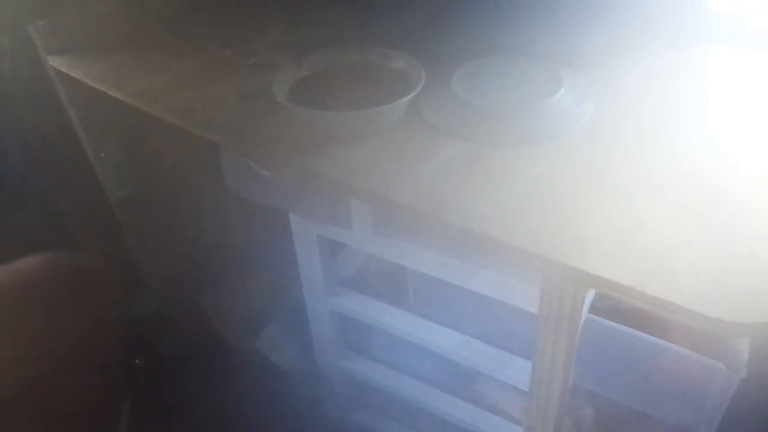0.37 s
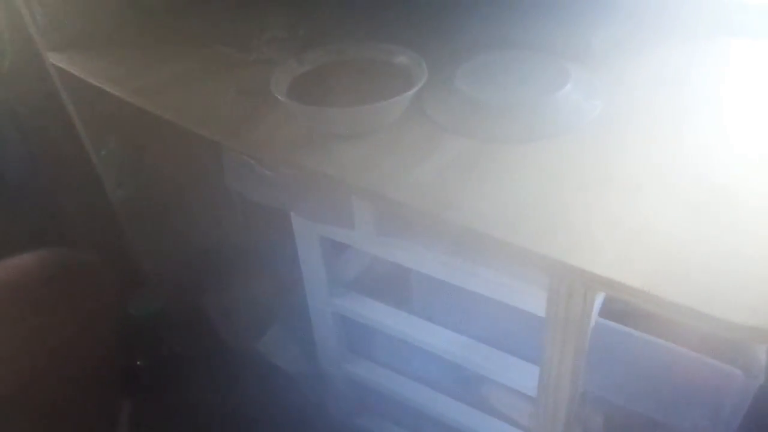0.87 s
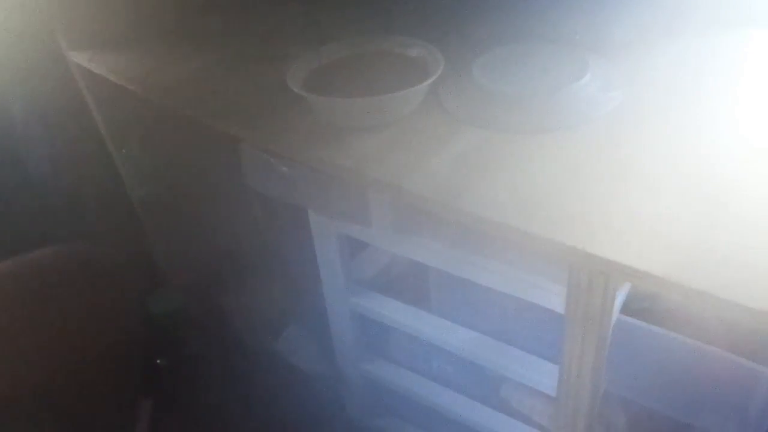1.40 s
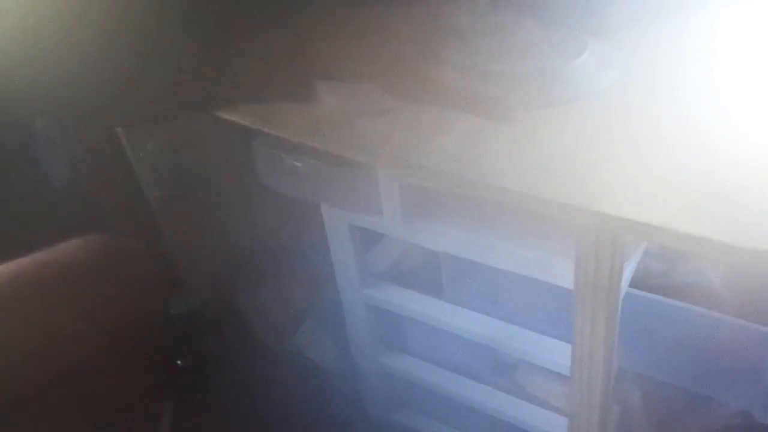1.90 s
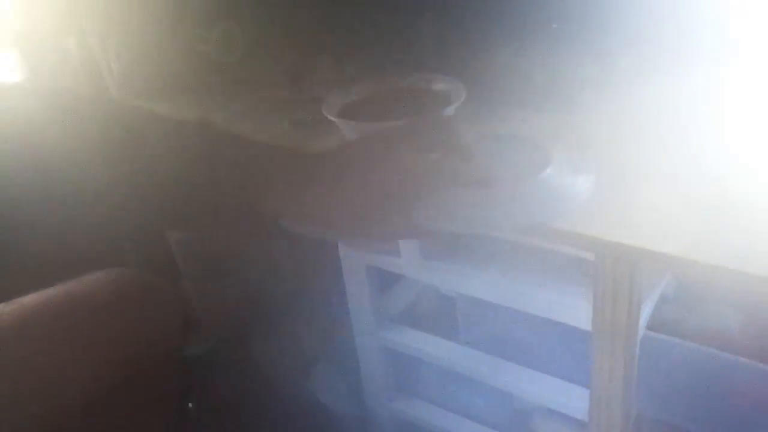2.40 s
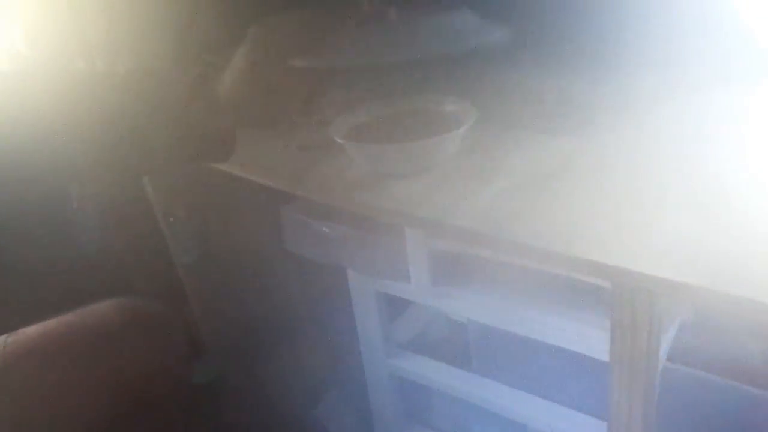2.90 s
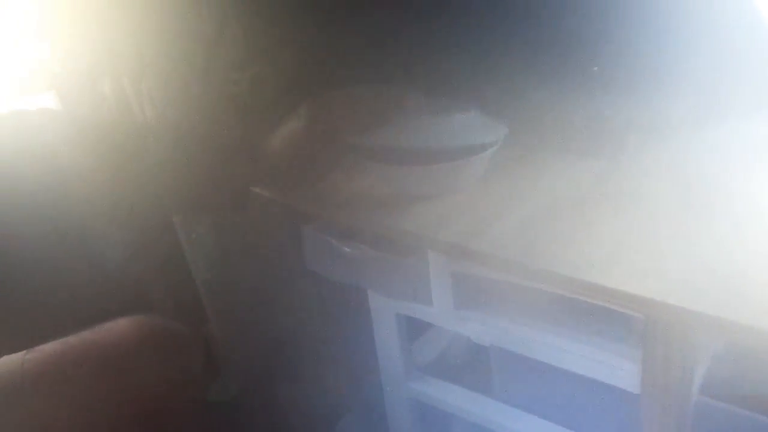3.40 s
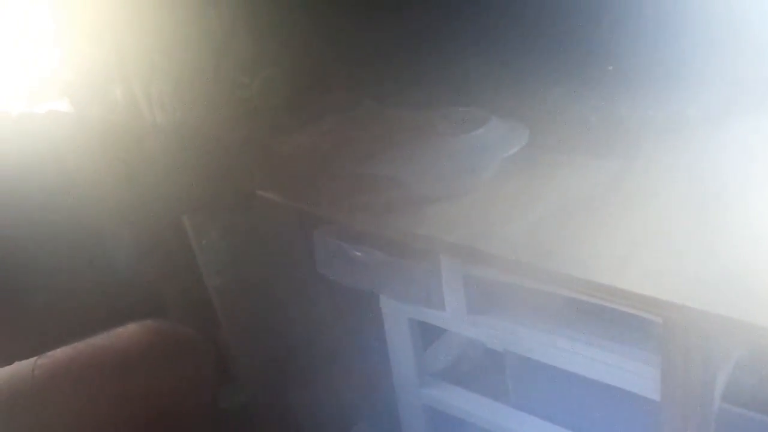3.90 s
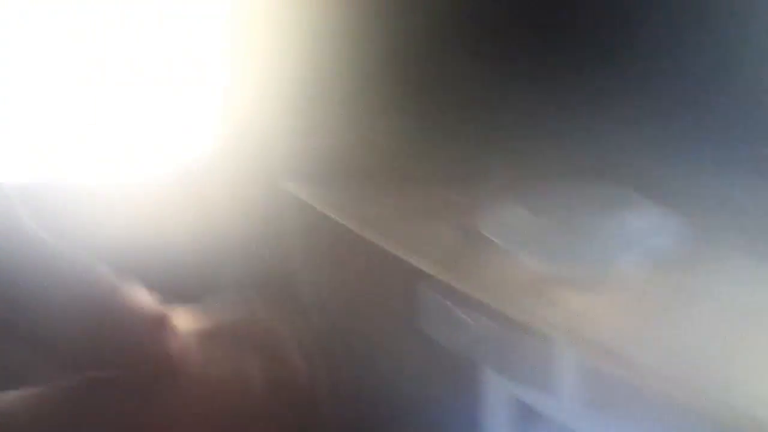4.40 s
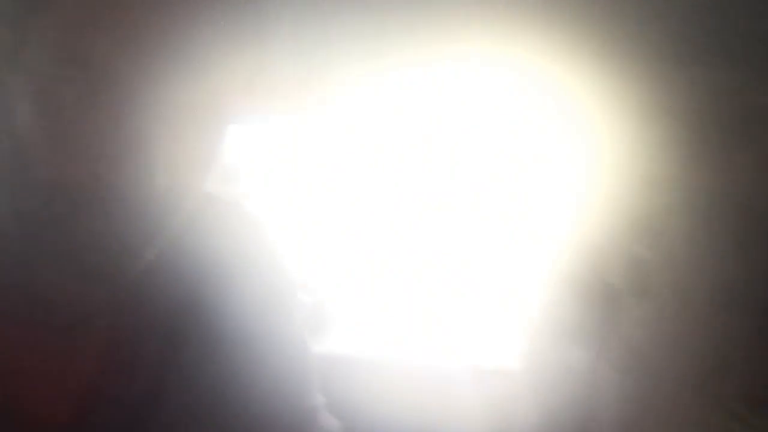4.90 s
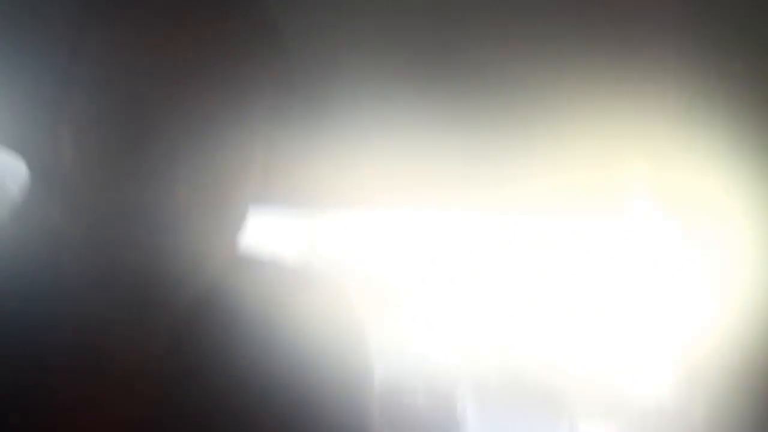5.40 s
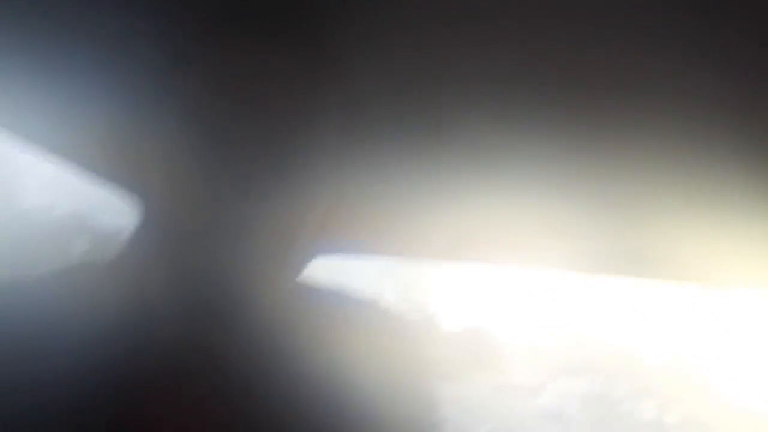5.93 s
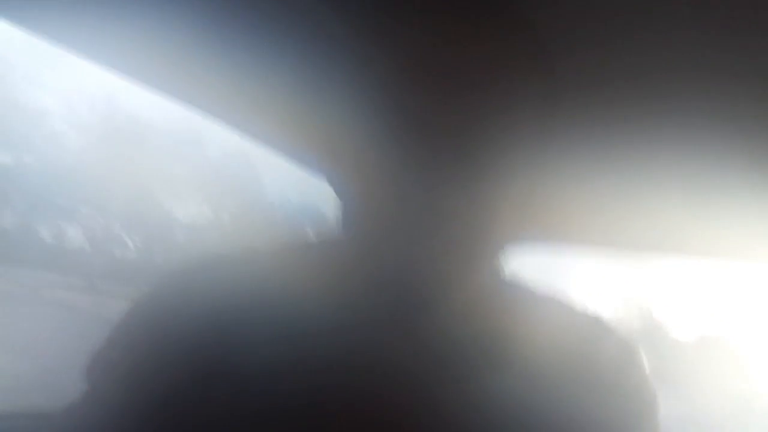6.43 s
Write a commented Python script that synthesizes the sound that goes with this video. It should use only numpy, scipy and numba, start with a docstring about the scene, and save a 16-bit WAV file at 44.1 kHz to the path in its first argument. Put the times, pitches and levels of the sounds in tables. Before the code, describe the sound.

Close clattering of spoon and crockery on a wooden counter, a gritty plate scrape, a hard set-down, then small sharp taps and faint rustles.

```python
"""A spoon drops and rattles in a dish on a wooden counter, close to the microphone in a small quiet cabin;
a plate is dragged off, knocks its rim and is set down on a bowl. Light taps and rustles are heard too.
Each blow rings the object's modes and a dense short clatter; rubbing is rough noise, partly through modes.
A short room tail, a low thud and a soft murmur lie underneath; the loudest blows clip."""
import sys
import numpy as np
from scipy import signal
from scipy.fft import rfft, irfft
from scipy.io import wavfile
from scipy.ndimage import uniform_filter1d
from numba import njit

SR = 44100
rng = np.random.default_rng(int(sys.argv[2]) if len(sys.argv) > 2 else 0)


def dump(signal):
    """Clip the signal to [-1, 1] and save it as 16-bit WAV at the path in sys.argv[1]."""
    limited = np.clip(np.atleast_2d(signal).T, -1, 1)
    pcm = np.round(limited * 32767).astype(np.int16)
    wavfile.write(sys.argv[1], SR, pcm)


def convert_level_to_amplitude(level_db):
    """Map a level in decibels to its linear amplitude factor."""
    exponent = np.asarray(level_db, float) / 20
    return 10 ** exponent


N = 288766
TIME = np.arange(N) / SR

# ringing modes of the spoon, the first a low thump of the counter beneath it: pitch_hz, level_db, t60_s
SPOON_MODES = [(50, -12.5, .06), (1124, 4.5, 0.13), (1256.4, -4.5, .06), (1900, -9.5, 0.083),
               (2160, -15, 0.041), (2359, -7, 0.13), (2705, -12.5, .05), (3517, -8.5, .2), (3505, -8, 0.26),
               (4560, -7.5, 0.17), (6673, -19.5, 0.15), (7500, -20.5, .15), (8100, -22, .1),
               (10900, -25.5, .04)]
# ringing modes of the plate: pitch_hz, level_db, t60_s
PLATE_MODES = [(90, -19.5, 0.072), (534, -2.5, 0.07), (826, 5.5, 0.04), (1130, -4, 0.21),
               (1276, -3.5, 0.034), (1841, -20.5, 0.021), (2364, -7, 0.22), (2886, 6, 0.048),
               (3730, 1, 0.031), (4490, 1, 0.052), (5105, -1.5, 0.075), (6400, -11, 0.097),
               (6830, -2.5, 0.048), (6720, -16.5, 0.2), (7600, -27, .06), (8530, -6, 0.07),
               (10400, -24, .06), (10800, -21.5, 0.16), (11300, -22, 0.05), (12420, -19.5, .08)]


def level(x, db):
    """Scale to an rms level in dB."""
    return x * convert_level_to_amplitude(db) / np.sqrt(np.mean(x ** 2))


def colour(x, points):
    """Filter by (Hz, dB) points joined on a log-frequency axis."""
    hz, db = np.transpose(points)
    bins_hz = np.fft.rfftfreq(len(x), 1 / SR)
    gain_db = np.interp(np.log(bins_hz + 1), np.log(hz), db)
    return irfft(rfft(x) * convert_level_to_amplitude(gain_db), len(x))


def treble(x, hz):
    """The part above hz, without phase shift."""
    return signal.sosfiltfilt(signal.butter(3, hz, "high", fs=SR, output="sos"), x)


def curve(table, column=1):
    """A dB column over time; -120 dB outside the table."""
    table = np.array(table)
    return np.interp(TIME, table[:, 0], table[:, column], left=-120, right=-120)


def walk(rate_hz, size=N):
    """Random levels held 1 / rate_hz s and slewed twice; spread near 1."""
    hold = int(SR / rate_hz)
    steps = np.repeat(rng.standard_normal(size // hold + 1), hold)
    return 1.3 * uniform_filter1d(uniform_filter1d(steps, hold), hold)[:size]


@njit
def add(out, start, hz, gain, rate, phase, grip, rise):
    """Add modes from one blow: each swells over the contact time, then decays as fast as the grip makes it."""
    for m in range(len(hz)):
        z = gain[m] * np.exp(1j * phase[m])
        turn = np.exp(2j * np.pi * hz[m] / SR)
        lack = 1.
        for i in range(start[m], len(out)):
            out[i] += z.imag * (1 - lack)
            z *= turn * (1 - rate[m] * grip[i])
            lack *= rise
            if abs(z.real) + abs(z.imag) < 3e-5:
                break


def strike(blows, modes, bands_db, grip, clatter_db, clatter_t60_s, shorten, tilt_db, scatter_db,
           contact_s, smear_s, scramble=1, count=120):
    """Every blow rings the object's modes plus many short unnamed ones; hardness and focus lean its balance."""
    # borders of the five bands: edge_hz
    band_edges_hz = [900, 1600, 3100, 4200]
    # where the blows land favours one region of the ring: from_s, favoured_hz
    spot = [(0, 1150), (1.0, 2400), (1.5, 1188), (1.655, 1900), (1.695, 2950), (1.72, 1455), (1.8, 1300),
            (2.1, 4970), (2.29, 560), (2.35, 1130), (2.59, 1180), (2.598, 4880), (2.66, 3660), (3.0, 1250),
            (3.49, 2800), (3.6, 804), (3.8, 522), (3.81, 3644), (3.815, 520), (3.87, 3720), (4.0, 1420),
            (5.0, 450)]
    spot_db, spot_octaves = 9, 0.26
    out = np.zeros(N)
    hz, db, t60_s = np.transpose(modes)
    step = np.arange(-2, 3)  # bands away from the middle one
    chances = rng.random((len(blows), 5, len(hz) + count))
    for (s, level_db, hard_db, focus_db), chance in zip(blows, chances):
        place = (np.arange(count) + chance[0, :count]) / count
        clatter_hz = 120 * (14000 / 120) ** place ** .75
        # each contact detunes the ring a little
        all_hz = np.r_[hz, clatter_hz] * (1 + .007 * (chance[4] - .5))
        all_db = np.r_[db, clatter_db + tilt_db * np.abs(np.log2(clatter_hz / 1500))]
        gain = convert_level_to_amplitude(all_db + scatter_db * (2 * chance[1] - 1))
        # share the blow's power among the bands
        band = np.digitize(all_hz, band_edges_hz)
        share = convert_level_to_amplitude(np.array(bands_db) + hard_db * step - focus_db * step ** 2)
        power = np.bincount(band, gain ** 2)
        gain = gain * (convert_level_to_amplitude(level_db) * share / np.sqrt(np.sum(share ** 2) * power))[band]
        # lean towards the favoured region at equal power
        spot_hz = [favoured_hz for since_s, favoured_hz in spot if since_s <= s][-1]
        lean = convert_level_to_amplitude(spot_db * np.exp(-(np.log2(all_hz / spot_hz) / spot_octaves) ** 2))
        gain = gain * lean * np.sqrt(np.sum(gain ** 2) / np.sum((gain * lean) ** 2))
        # the clatter dies faster towards the treble
        all_t60_s = np.r_[t60_s, clatter_t60_s * (clatter_hz / 1000) ** -shorten]
        rate = np.log(1000) / SR / all_t60_s
        # a rim lands point after point, so the modes do not all start together
        start = ((s + smear_s * chance[3] ** 3) * SR).astype(int)
        phase = 2 * np.pi * scramble * (chance[2] - .5)
        add(out, start, all_hz, gain, rate, phase, grip, np.exp(-1 / (contact_s * SR)))
    return out


def hand_grip():
    """How hard hand and contact damp spoon and plate, over time."""
    # damping: time_s, decay rate as a multiple of the free ring
    grip_points = [(1.54, 1.5), (1.75, 1.3), (2.1, 1.3), (2.59, 1.0), (2.675, 1.7), (2.73, 1.1), (3.5, 1.7),
                   (3.55, 1.2), (3.85, 1.7)]
    return np.clip(np.interp(TIME, *np.transpose(grip_points)), .3, 8)


def spoon_drop(grip):
    """The spoon bounces in the dish, each blow ringing its modes under a bright clatter."""
    # blows: start_s, level_db, hard_db gained per band upwards, focus_db lost per squared band from the middle
    blows = [(1.5404, 12.5, 0.5, 0), (1.5524, -8, -5, -6.5), (1.5874, 2, -1, 1.2), (1.5948, 1.5, 0.3, -1),
             (1.6334, -11.5, -1.4, -1.2), (1.6504, -10, -0.9, 0.3), (1.6594, -8.5, 0.5, 0.5),
             (1.6814, -9, 5, 1), (1.6964, -4, 1, 0), (1.7, 0, -1.44, -1.5), (1.7064, -10, 10, 3.5),
             (1.7344, 0, 2.9, 2), (1.7524, -9, 5, 1), (1.7674, -3.5, -1.5, 3.5),
             (1.7924, -16.5, -1.05, 1.3), (1.8114, -10.5, -6.5, 6), (1.8324, -10.5, -24.5, 5),
             (1.8474, -28, -25, -2), (1.8694, -28, -8, 4)]
    # balance of an average blow, five bands low to high: level_db
    bands_db = [-4, 7.5, 10.5, 2, -5.5]
    return strike(blows, SPOON_MODES, bands_db, grip, clatter_db=2.0, clatter_t60_s=0.035, shorten=.1,
                  tilt_db=-4.5, scatter_db=6.0, contact_s=0.00041, smear_s=0.0024)


def plate_knocks(grip):
    """The plate knocks its rim: longer contacts ring its modes, with little clatter."""
    # blows: start_s, level_db, hard_db gained per band upwards, focus_db lost per squared band from the middle
    blows = [(2.1662, -14.5, 1, 1.8), (2.1856, -17, -0.1, 1.9), (2.2245, -20, -1, 3), (2.2541, -20, 2, 2),
             (2.2992, -5.5, -9, 0.85), (2.3124, -8, -6, 2), (2.3264, -12.5, -13, -17.5),
             (2.372, -33.5, -6, -1), (2.4236, -27, -13, -2.9), (2.4382, -25, -4.5, -0.5),
             (2.594, 0.5, 1, 0.96), (2.5997, -8, 2.5, -2.26), (2.6184, -6, -2, -1.1),
             (2.6374, -12, -1.5, 1), (2.6439, -5.5, -1.5, 0.4), (2.6808, -5, -1.2, -0.7),
             (2.6865, -9.5, -1.35, -0.1), (2.6928, -2.5, -0.8, 1.5), (2.7034, -15, 0, -1.3)]
    # balance of an average blow, five bands low to high: level_db
    bands_db = [-5.5, -3, 0, -0.5, 0.5]
    return strike(blows, PLATE_MODES, bands_db, grip, clatter_db=-8.5, clatter_t60_s=.065, shorten=.1,
                  tilt_db=-4.5, scatter_db=7.5, contact_s=0.001, smear_s=0.0018)


def rocking(count=5):
    """Touches of the settling plate: ever slower, weaker and softer."""
    start_s, gap_s, growth = 3.8352, .011, 1.15
    k = np.arange(count)
    s = start_s + gap_s * (growth ** k - 1) / (growth - 1)
    level_db, hard_db = -10.5 - 3.5 * k, -0.4 - 1 * k
    return list(zip(s, level_db, hard_db, 0 * k - 1))


def plate_on_bowl(grip):
    """The plate is set down on the bowl and rocks to rest; the pair rings in modes of its own."""
    # blows: start_s, level_db, hard_db gained per band upwards, focus_db lost per squared band from the middle
    blows = [(3.485, 3.5, -0.5, 0.3), (3.4914, -6.5, 1.6, -3.04), (3.4989, -10.5, 1, 2),
             (3.5149, -23, 4.8, 1.5), (3.63, -42, -3, -1.2), (3.787, -24, -3.5, -0.05),
             (3.794, -33, 0.4, 1.3), (3.8052, 3, 0.05, -0.97), (3.8116, 1, 3.5, 1.7),
             (3.8202, -15, 1.5, -6.5)]
    # modes of the plate resting on the bowl: pitch_hz, level_db, t60_s
    modes = [(80.4, -20.5, .1), (245, -8, 0.25), (537.8, -2, 0.078), (820, 4.5, 0.12), (1276, -4, 0.077),
             (1750, -7.5, 0.012), (2340, -3, 0.069), (2810, 7, 0.085), (3628, -2.5, 0.051),
             (4390, 0.5, 0.05), (5120, 0, 0.043), (6710, -8, 0.097), (7092, -10.5, .045),
             (7430, -17.5, 0.028), (8700, -13, 0.095), (10070, -18.5, 0.046), (10630, -15.5, .04),
             (12200, -19.5, 0.05)]
    # balance of an average blow, five bands low to high: level_db
    bands_db = [-6.5, -1.5, 4, 1, 1]
    return strike([*blows, *rocking()], modes, bands_db, grip, clatter_db=-6, clatter_t60_s=0.043,
                  shorten=0.037, tilt_db=-5.0, scatter_db=3.5, contact_s=0.00061, smear_s=0.0024)


def thud():
    """One low damped swing under the first drop."""
    start_s, level_db, pitch_hz, t60_s = 1.5404, -22, 33, 0.086
    t = np.clip(TIME - start_s, 0, None)
    return convert_level_to_amplitude(level_db) * np.sin(2 * np.pi * pitch_hz * t) * np.exp(-np.log(1000) * t / t60_s)


def grit(per_s, size_db, catch_s, smooth):
    """Short catches of unequal size roughen smooth rubbing."""
    catches = (rng.random(N) < per_s / SR) * convert_level_to_amplitude(size_db * rng.exponential(size=N))
    catches = signal.lfilter([1], [1, -np.exp(-1 / (catch_s * SR))], catches)
    return (level(catches, 0) + smooth) * rng.standard_normal(N)


def ring(x, modes, damping, shift_db, span):
    """Rubbing through the modes of an object; the moving contact favours now one mode, now another."""
    out = np.zeros(N)
    part = slice(int(span[0][0] * SR), int(span[-1][0] * SR))
    for hz, db, t60_s in modes:
        pole = np.exp(2j * np.pi * hz / SR - damping * np.log(1000) / (t60_s * SR))
        push = x[part] * convert_level_to_amplitude(db + shift_db * walk(39, size=len(x[part])))
        out[part] += np.sqrt(damping / t60_s) * signal.lfilter([1], [1, -pole], push).imag
    return out / np.std(out[part])


def drag():
    """The plate's foot grinds over wood: grit hisses and shakes the plate's modes."""
    # sliding contact: time_s, level_db, treble_db against it
    slide = [(2.04, -73, -0.5), (2.078, -46.5, -4), (2.114, -47.5, -8.5), (2.162, -35, 10),
             (2.294, -29.5, 3.5), (2.32, -27.5, -1), (2.356, -38, -4), (2.448, -40, -7.5), (2.52, -64.5, 1)]
    # spectrum of the hiss: freq_hz, level_db (per Hz)
    hiss_points = [(59, -50), (100, -14.5), (400, -3), (993, -11.5), (1220, 1), (1810, -15), (2850, -9),
                   (6000, -20.5), (12400, -21.5), (14000, -27.5)]
    rub = grit(per_s=260, size_db=2.3, catch_s=0.00099, smooth=1.0)
    hiss = level(colour(rub, hiss_points), 0)
    both = hiss + convert_level_to_amplitude(-7.0) * ring(level(rub, 0), PLATE_MODES, damping=1.3, shift_db=3.1, span=slide)
    bright = treble(both, 4000)
    return convert_level_to_amplitude(curve(slide)) * (both - bright + convert_level_to_amplitude(curve(slide, column=2)) * bright)


def rattle():
    """The spoon chatters on between its clear bounces: gritty rubbing, plain and through its modes."""
    # chatter: time_s, level_db
    chatter = [(1.545, -39.5), (1.6, -34.5), (1.676, -29), (1.706, -27.5), (1.748, -22.5), (1.85, -29),
               (1.886, -34), (1.96, -67.5)]
    # spectrum of the plain rubbing: freq_hz, level_db (per Hz)
    rub_points = [(100, -24.5), (400, -9), (800, 2.5), (1300, -6.5), (2500, -3), (3600, -15.5),
                  (5000, -22.5), (9000, -32), (14000, -34)]
    rub = grit(per_s=360, size_db=2.5, catch_s=.0025, smooth=.6)
    plain = level(colour(rub, rub_points), 0.089)
    ringing = convert_level_to_amplitude(-9.5) * ring(rub, SPOON_MODES, damping=1.3, shift_db=5.5, span=chatter)
    return convert_level_to_amplitude(curve(chatter)) * (plain + ringing)


def taps():
    """Light taps ring the counter's modes in short sharp contacts."""
    # blows: start_s, level_db, hard_db gained per band upwards, focus_db lost per squared band from the middle
    blows = [(0.5644, -37, 3.5, -1.3), (0.7861, -23, 2.3, 2.5), (0.8, -32, 4, -2), (0.9744, -41, -4, 5),
             (1.4222, -40, 6, -1.5), (3.053, -38.5, 7, -4.5), (4.2714, -24, 5, 2),
             (4.5587, -30.5, 1.2, 1.1), (4.6964, -41, 0.1, 9), (4.7275, -36.5, -6.5, 2.3),
             (5.2434, -40, -1.5, 8), (5.3124, -37.5, -4, 3), (5.3217, -29.5, -2, 4),
             (5.3374, -32.5, -1.5, 4), (5.3508, -17.5, 0.76, 1), (5.4655, -29.5, -1, 3.5),
             (5.4824, -43.5, 10, -4), (5.4934, -25.5, -8.5, 5.5), (5.5119, -35, 3, -1.1),
             (5.6433, -38.5, -9, 4.5), (5.6512, -15.5, 2, 1.7), (5.7774, -36, -12, 0.1),
             (5.7838, -23, 1.1, 2.2), (5.7926, -14, 7.5, 0.9), (5.8024, -37, -9, -0.5), (5.896, -42, -4, 1),
             (5.903, -13, 0.97, 1.4), (6.0281, -27, 0.5, -0.1), (6.2886, -37, -2.5, 0.2),
             (6.3315, -38, 6, 3), (6.3462, -32, 2, -0.3), (6.5333, -29.5, -11, 6)]
    # modes of the counter: pitch_hz, level_db, t60_s
    modes = [(302.8, -8.5, 0.18), (892, -7.5, 0.154), (1395, -2.5, 0.046), (2438, -5, 0.035),
             (3093, 1.5, 0.011)]
    # balance of an average blow, five bands low to high: level_db
    bands_db = [3.5, 1.5, 3, -2.5, -9.5]
    # scramble: share of a turn by which the modes start out of step; small = a sharp click
    return strike(blows, modes, bands_db, np.ones(N), clatter_db=-3.0, clatter_t60_s=0.015, shorten=0.087,
                  tilt_db=-5.5, scatter_db=4.5, contact_s=0.00016, smear_s=0.0004, scramble=.8)


def rustle():
    """Cloth and hands brush about: each stroke swells, holds and fades."""
    # strokes: start_s of full level, hold_s, level_db, treble_db against it
    strokes = [(4.573, .01, -53.5, -0.8), (5.324, 0.027, -51, -9), (5.481, 0.017, -53.5, 3.5),
               (5.934, 0.17, -54.5, 7), (6.346, 0.0097, -52.5, -0.7)]
    # spectrum of the brushing: freq_hz, level_db (per Hz)
    rub_points = [(150, -12), (500, 4), (1200, 3.5), (2500, -3), (3700, -6), (5000, -14.5), (7000, -18),
                  (14000, -23.5)]
    rise_db_per_s, fall_db_per_s = 256, 145
    rub = level(colour(grit(per_s=300, size_db=1.0, catch_s=0.0037, smooth=3.1), rub_points), 0)
    bright, out = treble(rub, 2860), 0
    for s, hold_s, db, treble_db in strokes:
        before_s = np.clip(s - TIME, 0, None)
        after_s = np.clip(TIME - s - hold_s, 0, None)
        fade_db = rise_db_per_s * before_s + fall_db_per_s * after_s
        out = out + convert_level_to_amplitude(db - fade_db) * (rub - bright + convert_level_to_amplitude(treble_db) * bright)
    return out


def room(x):
    """Near walls give a short dense tail of decaying noise."""
    t60_s, tail_db = 0.057, -12
    t = np.arange(SR // 4) / SR
    tail = rng.standard_normal(len(t)) * np.exp(-np.log(1000) * t / t60_s) * (t > .002)
    tail = colour(tail, [(100, -3.5), (1500, -1.5), (12000, -6)])
    return x + convert_level_to_amplitude(tail_db) * signal.fftconvolve(x, tail / np.sqrt(np.sum(tail ** 2)))[:N]


def air():
    """Low murmur of the cabin with faint hiss: coloured noise, gently unsteady."""
    # spectrum of the murmur: freq_hz, level_db (per Hz)
    murmur_points = [(12, -47), (20, -15), (98, -5), (125, -5), (152, -10), (179, -0.5), (256, -4),
                     (286, -5.5), (481, -11.5), (551, -10.5), (650, -13), (879, -13.5), (14000, -29)]
    murmur = colour(rng.standard_normal(N), murmur_points)
    return level(murmur * convert_level_to_amplitude(0.28 * walk(3)), -54)


def scene():
    """All sources in the cabin, alike in both channels."""
    grip = hand_grip()
    blows = spoon_drop(grip) + plate_knocks(grip) + plate_on_bowl(grip) + taps()
    near = blows + drag() + rattle() + rustle()
    return np.tile(room(near) + thud() + air(), (2, 1))


def band_limit(x):
    """A steep low-pass at the top of the band."""
    return signal.sosfilt(signal.butter(12, 14490, fs=SR, output="sos"), x)


def record(dry):
    """The converter clips flat at full scale and the top is cut."""
    clipped = np.clip(dry, -1, 1)
    top_cut = signal.ellip(8, .2, 90, 14250, fs=SR, output="sos")
    return band_limit(signal.sosfilt(top_cut, clipped))


dry = scene()
out = record(dry)
dump(out)
```